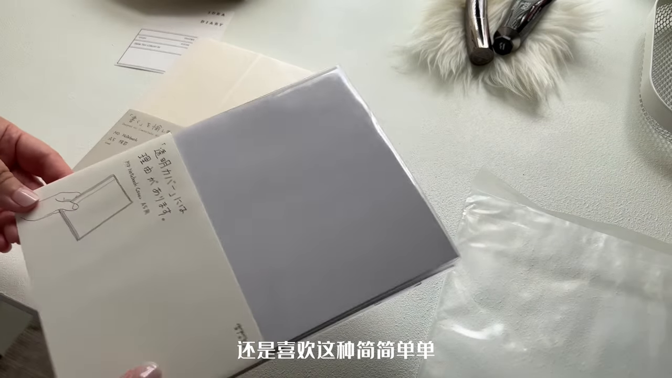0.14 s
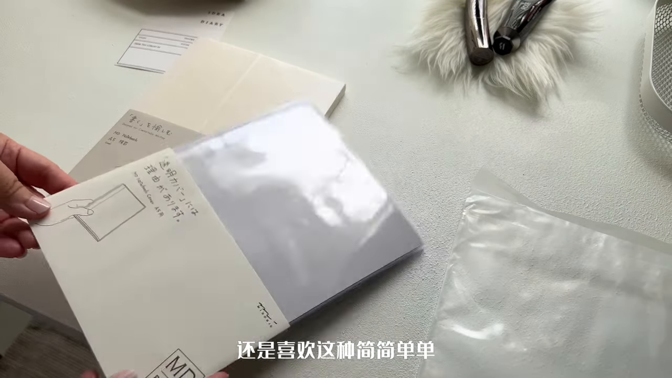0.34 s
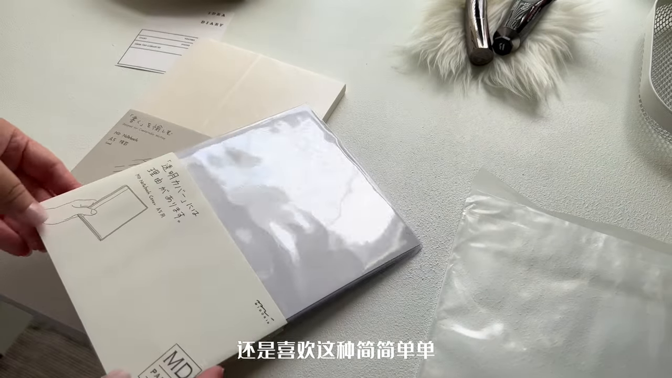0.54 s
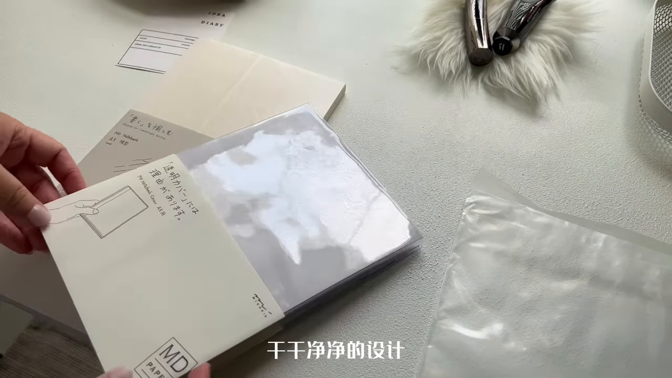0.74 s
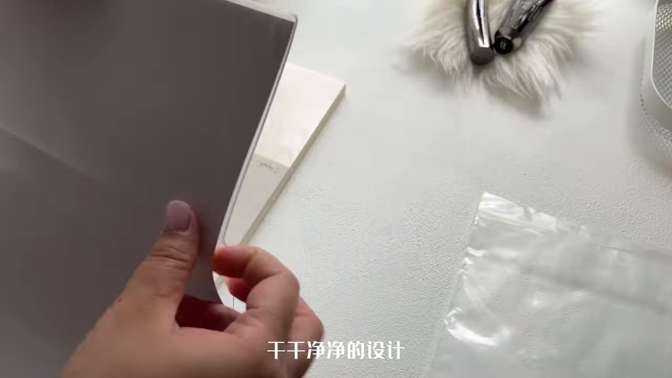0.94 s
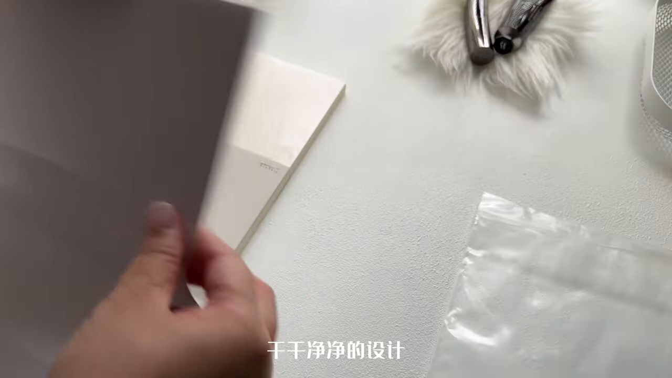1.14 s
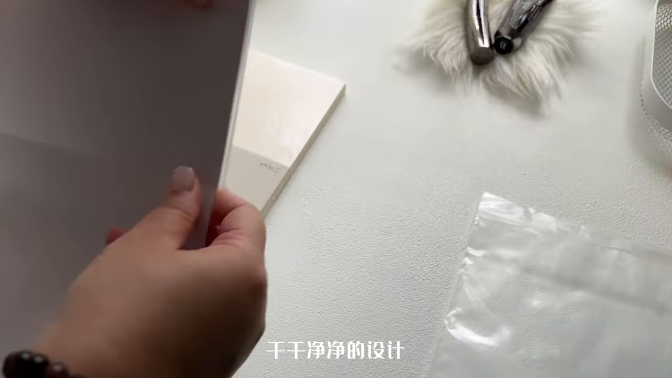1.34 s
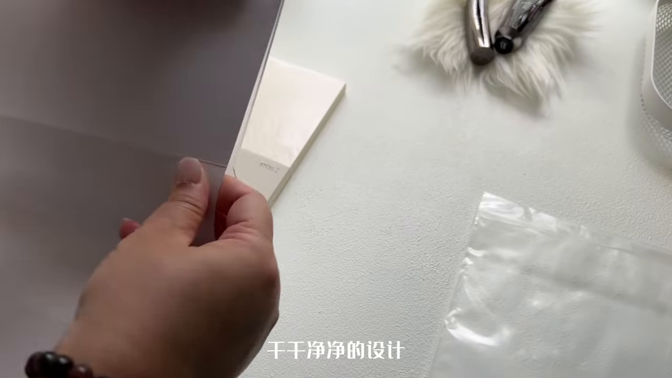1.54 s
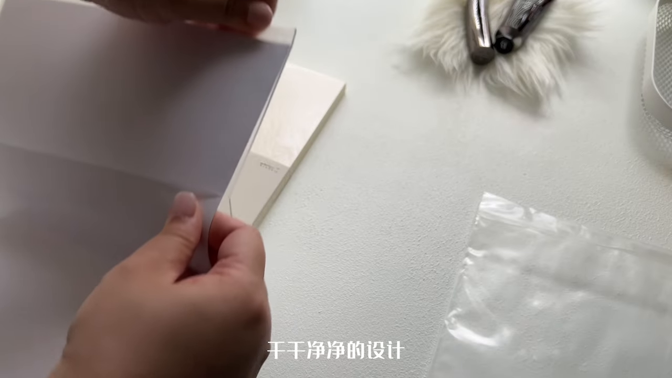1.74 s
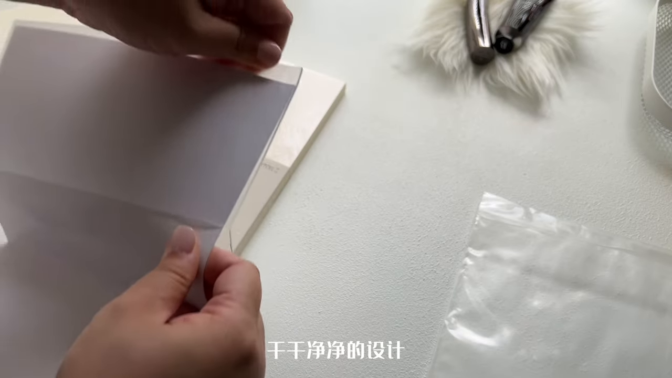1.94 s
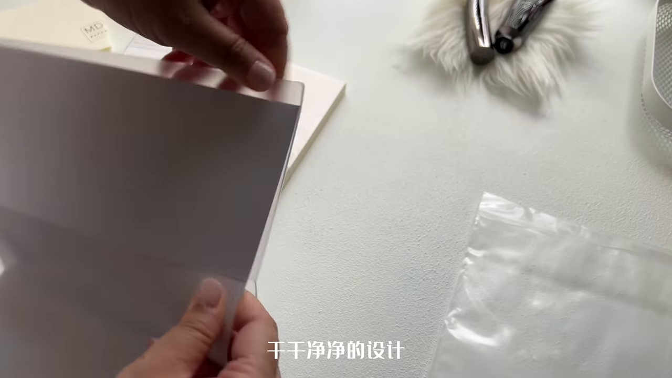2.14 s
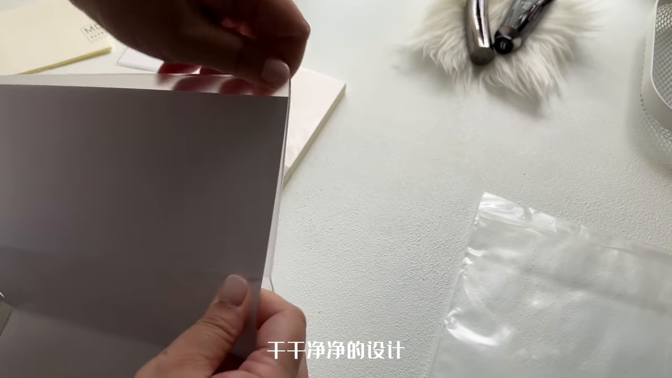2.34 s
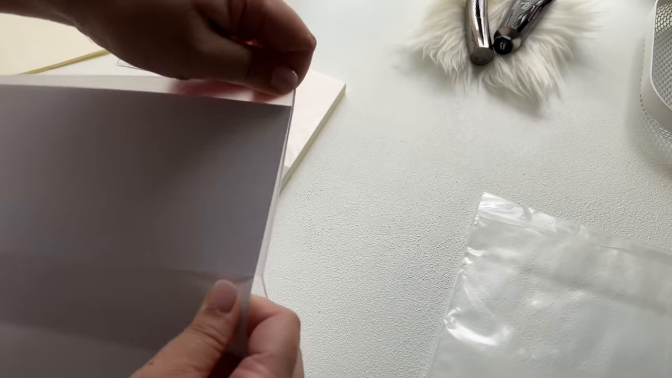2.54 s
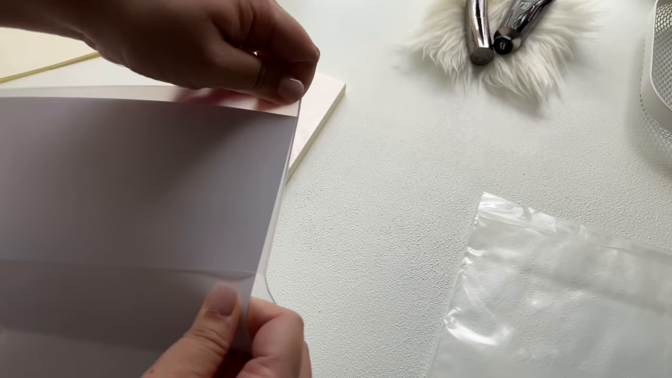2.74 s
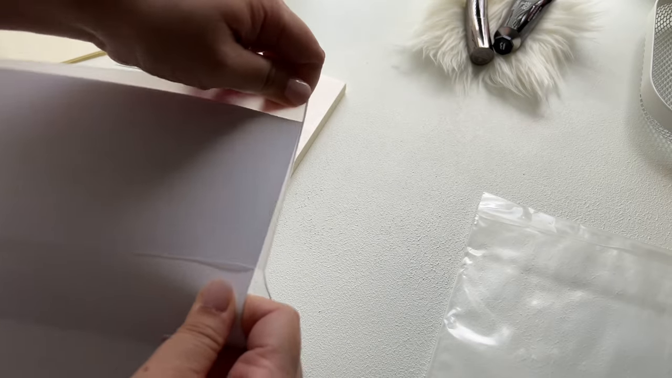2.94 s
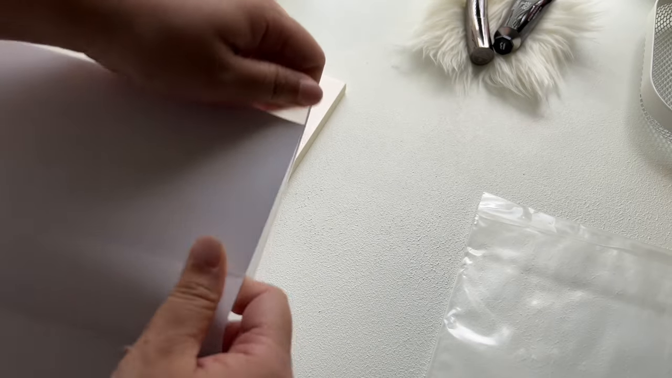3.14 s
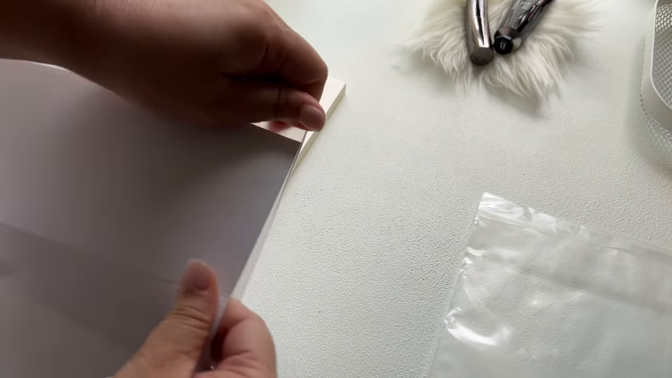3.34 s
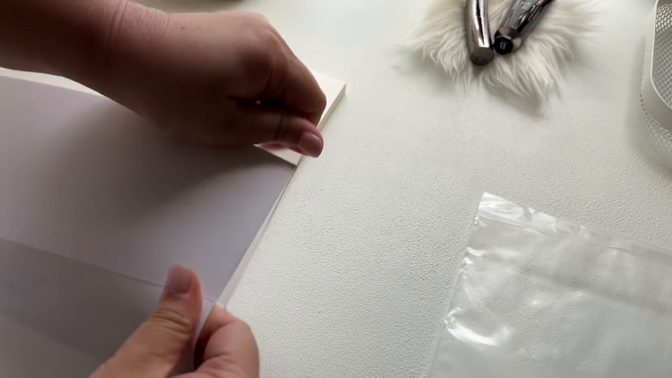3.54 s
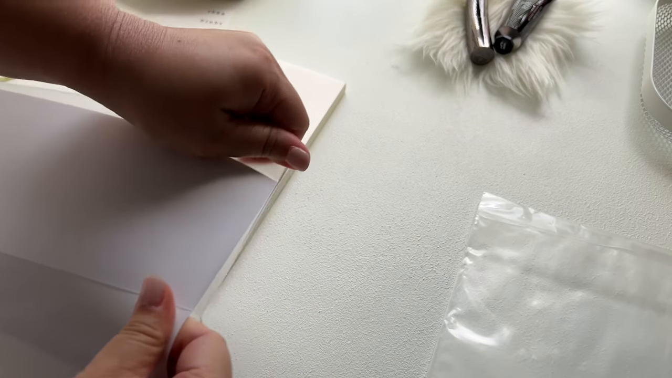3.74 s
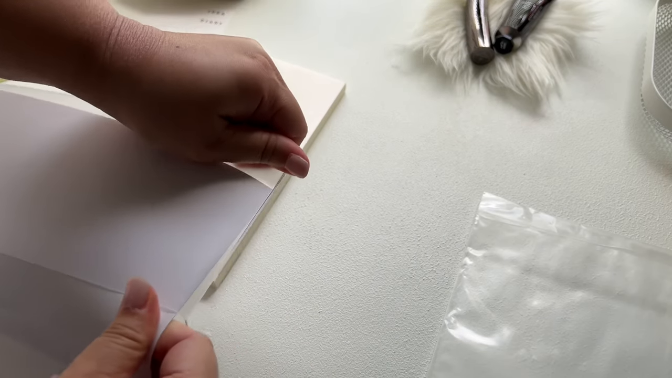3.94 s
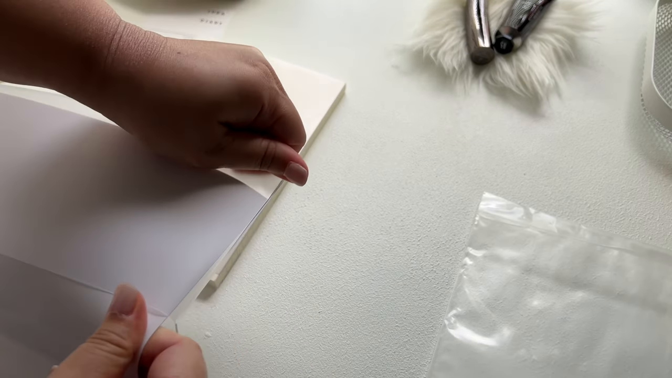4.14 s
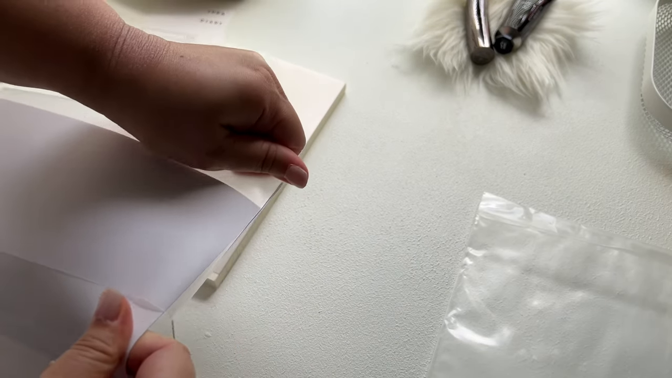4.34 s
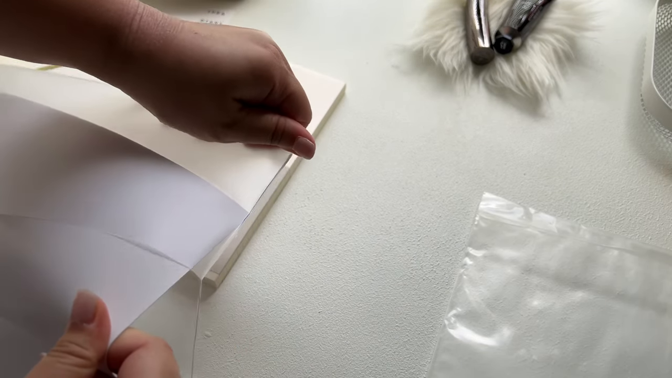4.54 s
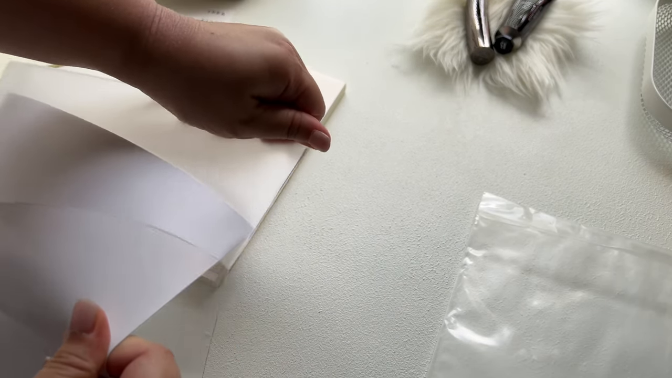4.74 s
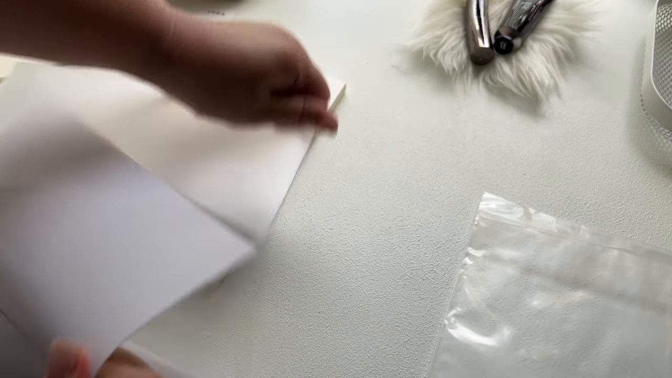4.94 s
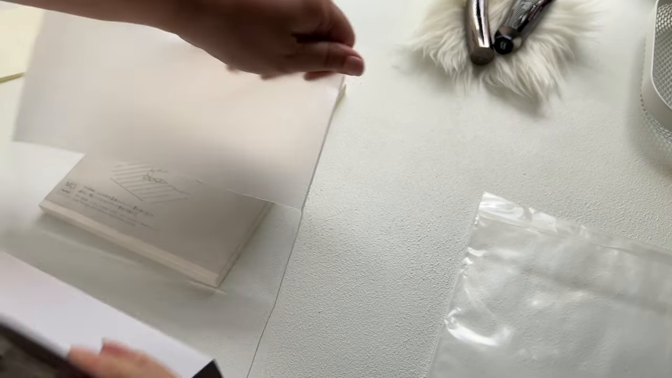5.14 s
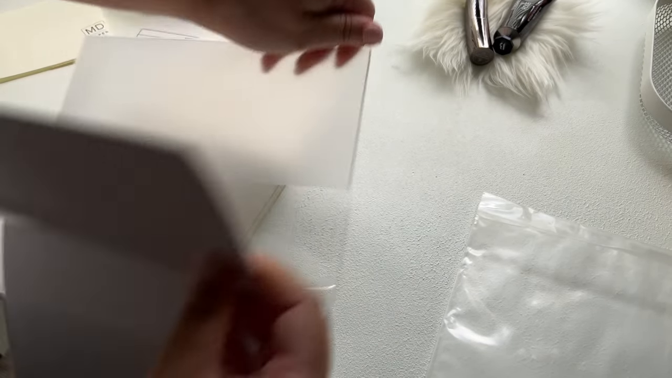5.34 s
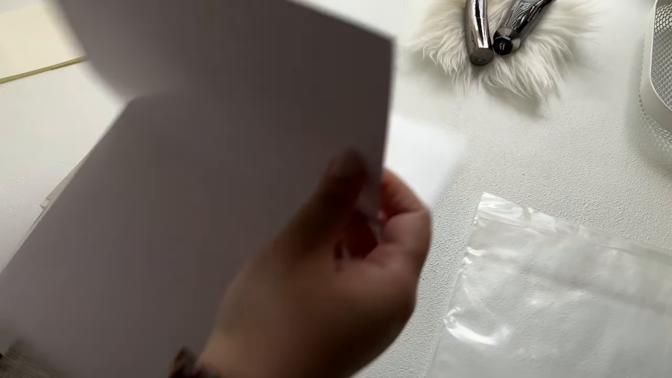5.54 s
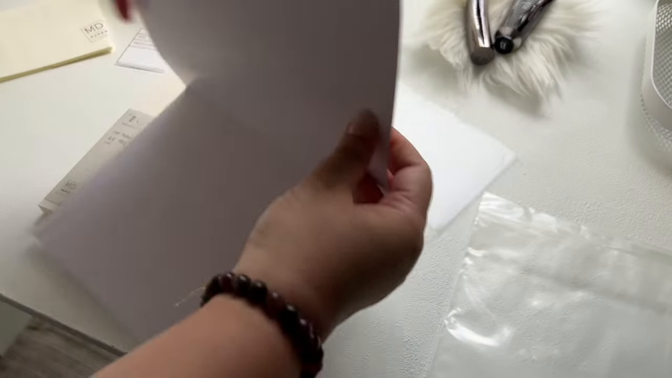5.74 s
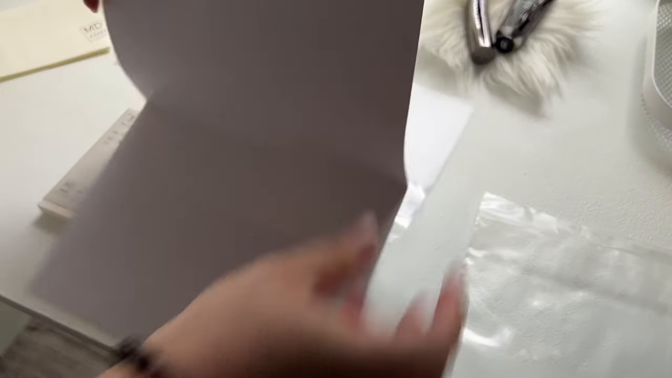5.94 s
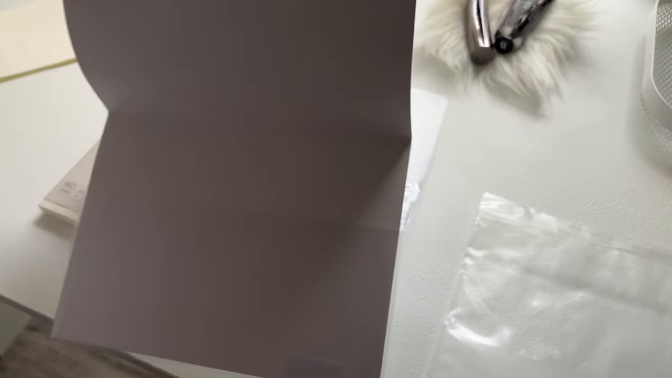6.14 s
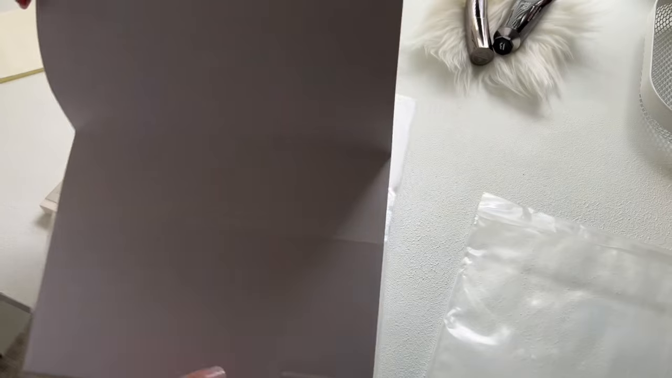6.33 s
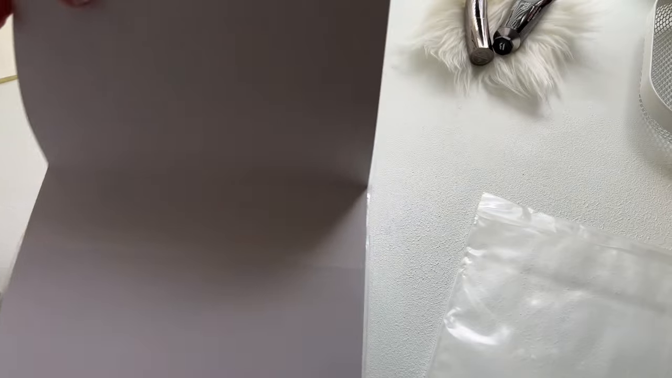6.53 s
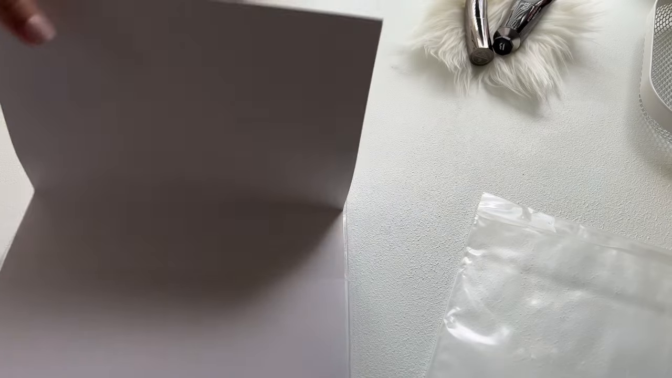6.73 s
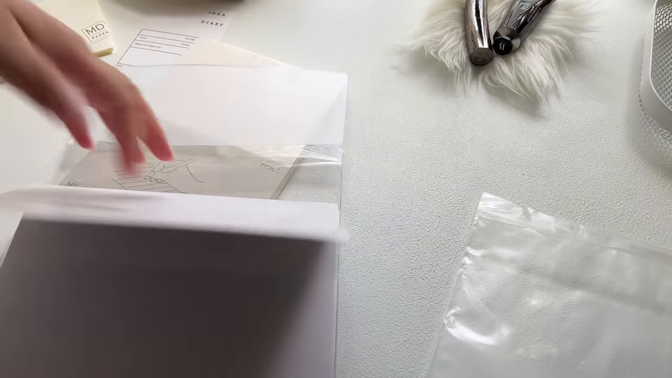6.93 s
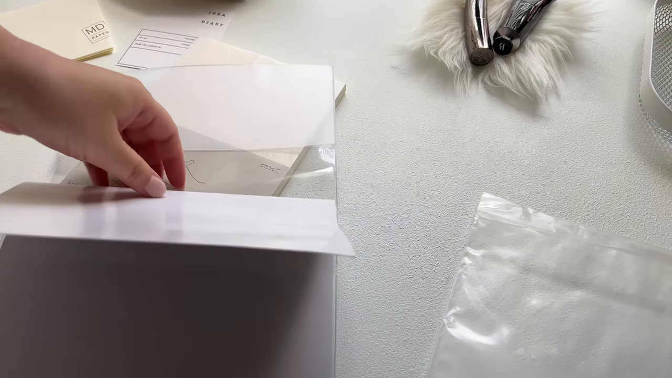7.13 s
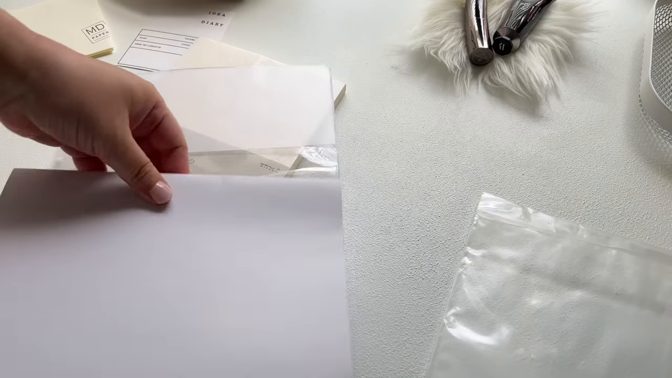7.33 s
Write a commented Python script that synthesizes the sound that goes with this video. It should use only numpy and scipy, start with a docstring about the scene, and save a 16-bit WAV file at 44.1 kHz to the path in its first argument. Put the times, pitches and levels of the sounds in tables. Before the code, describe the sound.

Intimate close stereo pickup, handling slightly left of centre. Card drags against plastic film with soft hisses, isolated dry snaps and little claps, leaving quiet gaps. A longer rasping pull swells, and the cover breaks free with a crisp slapping clatter and weighty desk thump. Afterwards stiff sheets swish, rustle and tap gently, with short small-room reflections and a faint wavering hum beneath.

```python
"""Notebook leaving its plastic sleeve

A card cover is worked out of a clear plastic sleeve on a desk, close to the ear, until it slips free and slaps down.
Friction of card and film is noise made of uneven slips; buckling film snaps and excites resonances of the sleeve.
Landing edges excite the cover and the decaying modes of the desk; the freed cover skims with a rising swish.
A small room adds early copies and a diffuse tail, over a faint wavering hum, a drone and air noise.
"""
import sys
import numpy as np
from scipy import signal
from scipy.fft import rfft, irfft, next_fast_len
from scipy.io import wavfile
from scipy.ndimage import uniform_filter1d, map_coordinates

SR = 44100
rng = np.random.default_rng(int(sys.argv[2]) if len(sys.argv) > 2 else 0)


def materialize(psi):
    """Save the field psi as 16-bit PCM at rate SR to the path in sys.argv[1].

    A 1-D psi becomes a single channel; in a 2-D psi each row is a channel.
    """
    bounded = np.clip(np.atleast_2d(psi).T, -1, 1)
    quanta = np.round(bounded * 32767).astype(np.int16)
    wavfile.write(sys.argv[1], SR, quanta)


N = 330309

# spectrum of the low drag of card on sleeve, also of air pushed by a thud: frequency_hz, density_db (per Hz)
DRAG_SPECTRUM = [(70, -17.5), (150, -2), (400, 2.5), (750, -4), (1300, -10.5), (3000, -45.5)]
# broad resonances of the stiff cover: centre_hz, width_hz, level_db
COVER_MODES = [(394, 26, 7), (626, 260, 2), (850, 200, -2), (1040, 100, -6), (1386, 120, -3),
               (1902, 910, -1.5), (2440, 1100, -3.5), (3730, 1900, -12)]
# balance of the hands' work, left of centre: frequency_hz, left_minus_right_db
HANDS_BALANCE = [(60, 9), (300, 7), (1200, 2), (4000, 4.5), (9000, 1.5), (14000, -1)]

FREE_S = 4.99  # the book slips free
ATTACK_S = 0.025  # sliding takes hold


def amp(db):
    """A level in decibels is 20 log10 of the gain returned."""
    return 10 ** (np.asarray(db) / 20)


def unit(x):
    """Normalise the mean power: rms 1."""
    return x / np.sqrt(np.mean(x ** 2) + 1e-20)


def along(points, hz):
    """Interpolate (Hz, value) points on a logarithmic frequency axis."""
    f, v = np.transpose(points)
    return np.interp(np.log(hz + 1), np.log(f + 1), v)


def wobble(rate, size=N):
    """Smooth random fluctuation: a spline through Gaussian knots, rate of them a second."""
    knots = rng.standard_normal(int(size * rate / SR) + 4)
    return map_coordinates(knots, [np.arange(size) * rate / SR])


def filtered(x, response):
    """Linear filtering: the spectrum is multiplied by a complex response of frequency."""
    n = x.shape[-1]
    m = 2 * next_fast_len(n // 2 + 2048)  # room for the response to ring out
    return irfft(rfft(x, m) * response(np.fft.rfftfreq(m, 1 / SR)), m)[..., :n]


def colour(points):
    """Minimum phase: folding the cepstrum of a (Hz, dB) outline gives a causal response."""
    def response(hz):
        cepstrum = irfft(np.log(amp(along(points, hz))))
        fold = 1 + np.sign(np.fft.fftfreq(len(cepstrum)))
        return np.exp(rfft(cepstrum * fold))
    return response


def resonances(modes):
    """Modal superposition: second-order (centre Hz, width Hz, dB) resonances of alternating sign."""
    def response(f):
        total = 0
        for k, (centre, width, db) in enumerate(modes):
            damping = 1j * f * width
            total = total + (-1) ** k * amp(db) * damping / (centre * centre - f * f + damping)
        return total
    return response


def touched(body, note_hz, note_db, share):
    """Local excitation: a body's broad resonances plus the note of the touched spot, share of its pitch wide."""
    note = [(note_hz, share * note_hz, note_db)]
    return lambda hz: resonances(body)(hz) + resonances(note)(hz)


def stereo(pair):
    """Interchannel coherence: two unrelated signals mix into channels that are alike in the bass."""
    # likeness of the channels: frequency_hz, coherence (0-1)
    likeness = [(60, 1), (200, 0.84), (600, 0.5), (1500, 0.27), (4000, 0.25), (10000, 0.11)]

    def mid_side(hz):
        turn = np.arccos(np.clip(along(likeness, hz), -1, 1)) / 2
        return np.array([np.cos(turn), np.sin(turn)])
    mid, side = filtered(pair, mid_side)
    return np.array([mid + side, mid - side])


def leftward(x, balance=HANDS_BALANCE):
    """Interaural level difference: half of a left minus right balance goes to each channel."""
    return filtered(x, lambda hz: amp(np.outer([.5, -.5], along(balance, hz))))


def add(track, s, sound):
    """Superposition: mix a sound in at time s."""
    part = track[:, max(round(s * SR), 0):][:, :sound.shape[-1]]
    part += sound[..., :part.shape[-1]]


def burst(response, t60, chatter_db, chatter_t60, click=0, rattle_db=4):
    """Impact excitation: decaying noise, click and uneven rattle drive a body; energy of 10 ms at rms 1."""
    t = np.arange(SR // 3) / SR
    rise = .0009  # s
    rattle = unit(amp(rattle_db * np.clip(wobble(350, size=len(t)), -2, 2)))
    chatter = rattle * amp(chatter_db - 60 * t / chatter_t60)
    envelope = (amp(-60 * t / t60) + chatter) * (1 - np.exp(-(t / rise) ** 2))
    force = stereo(rng.standard_normal((2, len(t)))) * envelope
    # one impulse at the same moment in both channels
    force[:, round(2 * rise * SR)] += click * np.linalg.norm(force, axis=1)
    sound = filtered(force, response)
    return sound * np.sqrt(SR // 100 / np.sum(sound ** 2, axis=1, keepdims=True))


def friction(spectrum, grain_db, grain_rate, judder_db):
    """Stick-slip noise: countless tiny slips of uneven size, bunched by the unsteady hand; rms 1."""
    slips = amp(grain_db * wobble(grain_rate) + judder_db * wobble(35))
    return unit(filtered(stereo(rng.standard_normal((2, N))) * slips, colour(spectrum)))


def film(edge_hz):
    """Low-pass loss: the snap of thin plastic, rolled off above the edge."""
    # spectrum of the snap: frequency_hz, density_db (per Hz)
    snap_spectrum = [(900, 1.5), (2200, -2.5), (3800, -0.5), (6000, -3.5), (8800, 0), (10500, -8.5),
                     (15500, -11.5)]
    return lambda hz: colour(snap_spectrum)(hz) / (1 + 1j * hz / edge_hz) ** 2


def hum():
    """Steady background: a low wavering tone, narrow-band drone noise and faint broadband air noise."""
    # bands of the room's drone: centre_hz, width_hz, level_db
    drone_bands = [(34.3, 3.3, -10), (61.5, 8.8, -6), (84.7, 10.6, -9.5), (136.4, 8.7, -13),
                   (222, 6, -17.5)]
    # spectrum of the air noise: frequency_hz, density_db (per Hz)
    air_spectrum = [(20, -28.5), (50, 9), (110, 8), (250, -2.5), (450, -15), (1000, -25), (3000, -33.5),
                    (9000, -48), (15000, -43)]
    hum_hz = 58.8

    def noise(response):
        return unit(filtered(stereo(rng.standard_normal((2, N))), response))
    phase = 2 * np.pi * hum_hz * np.arange(N) / SR + .5 * wobble(3.7)
    tone = np.sqrt(2) * np.sin(phase)
    tone = unit(tone * np.abs(1 + 1.5 * wobble(9)))  # the hum wavers
    drone = noise(lambda hz: resonances(drone_bands)(hz) / (1 + (hz / 300) ** 4))
    return amp(-51.5) * tone + amp(-53.0) * drone + amp(-63) * noise(colour(air_spectrum))


def strokes():
    """Summed powers give gains of drag, rub and hiss: strokes rise, hold and die; a tight card drags more."""
    # hand strokes, relative levels of card rub and film hiss: start_s, length_s, rub_db, hiss_db
    stroke_table = [(0.103, 0.26, -91, -66.5), (0.483, 0.18, -106, -74), (0.761, 0.13, -90, -74.5),
                    (0.928, 0.13, -58.5, -69.5), (1.044, 0.088, -65, -58), (1.113, 0.08, -59, -53),
                    (1.237, 0.061, -67, -60.5), (1.363, 0.056, -78.5, -73), (1.632, 0.7, -78, -91),
                    (1.917, 0.074, -71, -87), (2.053, 0.13, -68, -65.5), (2.84, 0.3, -75.5, -93),
                    (2.994, 0.025, -60, -64), (3.064, 0.21, -62.5, -58.5), (3.278, 0.15, -68.5, -81),
                    (3.553, 0.047, -75, -77), (3.973, 0.062, -71, -106), (4.915, 0.059, -48.5, -38),
                    (5.18, 0.33, -60, -74), (5.403, 0.038, -80, -63), (5.515, 0.11, -57.5, -59),
                    (5.647, 0.036, -44.5, -59), (5.748, 0.12, -63.5, -65.5), (5.903, 0.11, -59, -68),
                    (5.999, 0.72, -72, -80), (6.196, 0.1, -67, -70), (6.54, 0.12, -67.5, -67),
                    (6.643, 0.17, -62, -79), (6.999, 0.1, -64, -75), (7.147, 0.35, -64.5, -85.5),
                    (7.383, 0.068, -76, -66)]
    rest_rub_db, rest_hiss_db = -91, -90.5  # card and film barely moving
    release_db_per_s = 222.5  # a stroke dies once the hand stops
    tight_drag_db, loose_drag_db = 6.5, -3  # drag over rub, before and after the book slips free
    t = np.arange(N) / SR
    power = np.outer(amp([rest_rub_db, rest_hiss_db]) ** 2, np.ones(N))
    for start, length, rub_db, hiss_db in stroke_table:
        rise = np.clip((t - start) / ATTACK_S, 0, 1)
        envelope = rise * amp(-release_db_per_s * np.clip(t - start - length, 0, 1))
        power += np.outer(amp([rub_db, hiss_db]), envelope) ** 2
    rub, hiss = np.sqrt(power)
    drag = rub * amp(np.where(t < FREE_S, tight_drag_db, loose_drag_db))
    return np.array([drag, rub, hiss])


def crinkle(count, centre_hz, spread, cycles, spread_db):
    """Shot noise: creases pop at random moments and pitches, many faint and a few strong; rms 1."""
    out, t = np.zeros((2, N)), np.arange(SR // 100) / SR
    moments, sizes = rng.random(count), rng.exponential(size=count)
    pitches, sides = rng.standard_normal((2, count))
    for when, size, pitch, side in zip(moments, sizes, pitches, sides):
        hz = centre_hz * np.exp(spread * pitch)
        # a pop falls 60 dB in the given number of cycles
        pop = amp(spread_db * min(size, 3) - 60 * t * hz / cycles) * np.sin(2 * np.pi * hz * t)
        add(out, when * N / SR, np.outer([np.cos(side), np.sin(side)], pop))
    return unit(stereo(out))


def patchy(x, depth_db):
    """Time-varying filtering: as the sheet flexes, its colour shifts from moment to moment."""
    z = signal.stft(x, nperseg=512)[2]
    field = rng.standard_normal(z.shape[1:])
    field = uniform_filter1d(field, size=5, axis=0)  # across frequency
    field = uniform_filter1d(field, size=8, axis=1)  # across time
    return signal.istft(z * amp(depth_db * unit(field)), nperseg=512)[1][:, :N]


def off_the_cover(x, centre_delay_s, sway, reflection):
    """Comb filtering: the moving cover mirrors the sound over a changing path, sweeping hollows through it."""
    n = np.arange(N)
    delay = centre_delay_s * np.exp(sway * wobble(2.3)) * SR
    copy = np.array([map_coordinates(channel, [n - delay], order=3) for channel in x])
    return (x + reflection * copy) / np.hypot(1, reflection)


def sliding():
    """Dry friction: card drags and rubs along the sleeve while the thin film hisses and crinkles."""
    # spectra of card rub, whole-face rustle and film hiss: frequency_hz, density_db (per Hz)
    rub_spectrum = [(350, -19), (750, -7.5), (1600, -5), (2400, -8), (3600, -14.5), (6000, -18),
                    (12000, -42.5)]
    rustle_spectrum = [(200, -7.5), (450, -3), (750, -1.5), (1000, 0), (1600, 1.5), (2400, -4),
                       (4200, -6.5), (7000, -16), (14000, -35.5)]
    hiss_spectrum = [(1500, -23), (3500, -1.5), (5200, 5.5), (7000, 3), (8700, 9.5), (10200, -14.5),
                     (11300, 3.5), (12600, -4.5), (13800, -19.5), (15200, -5)]
    stroke_drag, stroke_rub, stroke_hiss = strokes()
    pull_drag, pull_rustle, pull_hiss = pulls()
    drag_gain = np.hypot(stroke_drag, pull_drag)
    hiss_db = 20 * np.log10(np.hypot(stroke_hiss, pull_hiss))
    rub_db = 20 * np.log10(stroke_rub)
    # a long pull slides the whole face of the cover: an even, broad rustle
    rustle = pull_rustle * friction(rustle_spectrum, grain_db=1.5, grain_rate=410, judder_db=-2.0)
    drag = drag_gain * friction(DRAG_SPECTRUM, grain_db=2.5, grain_rate=200, judder_db=1)
    rub = stroke_rub * friction(rub_spectrum, grain_db=1.5, grain_rate=490, judder_db=0.0)
    hiss = amp(hiss_db + 1.5) * friction(hiss_spectrum, grain_db=-0.5, grain_rate=740, judder_db=4.0)
    # a strong hiss gains extra fizz at the very top
    fizz = filtered(hiss, lambda hz: 1 / (1 + (10500 / (hz + 1)) ** 8))
    hiss = hiss + amp((hiss_db + 45) / 2) * fizz
    # creases grow more slowly than the rub: they stand out at a light touch
    pops = crinkle(count=1200, centre_hz=2500, spread=.5, cycles=10, spread_db=4)
    creases = amp(.8 * rub_db - 16) * pops
    sheet = patchy(drag + rub + hiss, depth_db=2.07) + creases
    return leftward(rustle + off_the_cover(sheet, centre_delay_s=0.00066, sway=.4, reflection=0.11))


def ticks():
    """Snap-through buckling: the film snaps and briefly rings the bent sleeve; weak snaps are duller."""
    # buckles, relative levels of snap and ring, note of the spot: start_s, snap_db, ring_db, note_hz
    buckles = [(0.3484, -41, -61, 880), (0.387, -47, -57, 940), (0.958, -55, -49, 770),
               (0.969, -40.5, -44.5, 1400), (1.353, -43.5, -73, 1700), (1.5305, -52, -54, 895),
               (1.6724, -36.5, -44.5, 865), (1.776, -65, -54.5, 1400), (1.856, -57, -59.5, 1590),
               (1.905, -74, -52.5, 860), (1.954, -55, -52, 1390), (1.966, -55, -48, 1370),
               (2.1185, -39.5, -59, 1400), (2.122, -33.5, -52.5, 1440), (2.171, -64, -51.5, 1520),
               (2.441, -62, -55.5, 900), (2.589, -41.5, -50.5, 900), (2.641, -56, -52.5, 860),
               (2.796, -74, -51, 1590), (2.8588, -53, -49.5, 1480), (2.8934, -49, -54, 1840),
               (2.9282, -42, -45.5, 1590), (2.95, -41, -45.5, 1770), (2.9696, -41, -44, 1490),
               (3.0052, -30, -40, 1510), (3.07, -37, -59, 1500), (3.292, -52, -52, 3400),
               (3.387, -49, -56, 1820), (3.445, -46.5, -50.5, 1530), (3.463, -50, -48.5, 1580),
               (3.578, -46, -56, 1480), (3.606, -56.5, -66, 1480), (3.873, -38, -45.5, 884),
               (4.1793, -37, -48.5, 1410), (4.2602, -41.5, -44, 1430), (5.1856, -37, -35, 1830),
               (5.496, -35.5, -45, 1930), (5.5438, -24.5, -50, 2600), (5.669, -45, -38.5, 1710),
               (5.879, -41.5, -70, 4920), (6.639, -46, -56, 4060), (6.676, -42, -50, 1270),
               (7.0056, -40.5, -44.5, 1700), (7.22, -60, -50, 1208), (7.332, -58, -48.5, 1300),
               (7.4174, -46, -44, 2510), (7.472, -54, -38, 1350)]
    # broad resonances of the bent sleeve: centre_hz, width_hz, level_db
    sleeve_modes = [(522, 640, 1), (963, 370, 4.5), (1420, 180, 2), (1910, 630, -11)]
    out = np.zeros((2, N))
    for s, snap_db, ring_db, note_hz in buckles:
        edge_hz = 18000 * amp((snap_db + 45) / 2)
        snap = burst(film(edge_hz), t60=0.016, chatter_db=-31.5, chatter_t60=0.042, click=0.23)
        sleeve = touched(sleeve_modes, note_hz, note_db=9.0, share=0.13)
        ring = burst(sleeve, t60=0.013, chatter_db=-14, chatter_t60=0.074, click=0.17)
        add(out, s, amp(snap_db - 17.0) * snap + amp(ring_db - 6.5) * ring)
    return leftward(out)


def scuffs():
    """Forced resonance: the card catches, and a short soft swell of slips rings the stiff cover."""
    # scuffs, with the note of the bent spot and the Gaussian spread: peak_s, level_db, note_hz, spread_s
    scuff_table = [(1.066, -43, 660, 0.0096), (5.404, -48, 1803, 0.01), (5.687, -38.5, 1744, 0.0072),
                   (5.782, -51.5, 1260, 0.0079), (5.834, -55, 1717, 0.0085), (5.967, -54.5, 1360, 0.0203),
                   (6.297, -60, 585, 0.02), (6.41, -58, 478, .014), (6.738, -48, 737, 0.0092),
                   (7.087, -49, 1090, 0.0064), (7.482, -47.5, 1340, 0.0033)]
    soft_edge_hz = 14000  # a scuff is soft above this
    out, t = np.zeros((2, N)), np.arange(SR // 5) / SR - .1
    for s, db, note_hz, spread_s in scuff_table:
        slips = stereo(rng.standard_normal((2, len(t)))) * amp(0.91 * wobble(430, size=len(t)))
        cover = touched(COVER_MODES, note_hz, note_db=10, share=0.18)
        sound = unit(filtered(slips, lambda hz: cover(hz) / (1 + 1j * hz / soft_edge_hz)))
        add(out, s + t[0], amp(db) * np.exp(-(t / spread_s) ** 2 / 2) * sound)
    return leftward(out)


def thud(attack, ring_share):
    """Modal decay: a soft blow pushes the air under the book; desk and book ring, each mode varying in level."""
    # modes of the book lying on the desk: frequency_hz, level_db, t60_s
    desk_modes = [(61.5, -9.5, 0.38), (89.6, 1, 0.16), (107, -3.5, 0.23), (136.4, -0.5, .38),
                  (197.5, -3, 0.15), (255, 0.5, 0.13), (298.2, -1.5, 0.11), (396, 1, 0.11)]
    t = np.arange(SR // 3) / SR
    ring = 0
    for k, (hz, db, t60) in enumerate(desk_modes):
        decay = amp(db + rng.standard_normal() - 60 * t / (t60 * ring_share))
        ring = ring + (-1) ** k * decay * np.sin(2 * np.pi * hz * t)
    push = burst(colour(DRAG_SPECTRUM), t60=0.06, chatter_db=-16.5, chatter_t60=0.17)
    return ring * (1 - np.exp(-t / attack)) + amp(-2.5) * push


def knocks():
    """Impact: a landing edge slaps the film and claps the cover, and the book's weight thuds into the desk."""
    # landings, relative levels of cover clap, desk thud and film slap, note of the struck spot:
    # start_s, clap_db, thud_db, slap_db, note_hz
    landings = [(1.1358, -22.5, -45, -58, 695), (1.151, -29.5, -67, -55, 660),
                (1.173, -48, -45.5, -66, 614), (1.399, -50, -46, -74, 590), (2.167, -44, -47.5, -76, 960),
                (2.198, -57, -45.5, -53, 870), (2.298, -38, -38.5, -51.5, 1200),
                (3.0798, -32.5, -42.5, -33.5, 570), (3.234, -31.5, -40, -53, 1520),
                (4.906, -22.5, -25.5, -23, 1084), (4.914, -21, -35, -23.5, 3300),
                (4.967, -27, -50, -45.5, 674), (4.996, -21.5, -17.5, -12, 774),
                (5.0341, -11.5, -30.5, -17.5, 1276), (5.048, -22, -23.5, -43.5, 900),
                (5.066, -28.5, -27.5, -46.5, 1000), (5.115, -43, -36, -57, 650),
                (5.6155, -29.5, -35.5, -33, 900), (5.821, -40.5, -46.5, -47, 720),
                (6.5336, -36, -46.5, -48, 976), (7.1758, -29.5, -54, -50, 1112)]
    # balance of the landings, left of centre: frequency_hz, left_minus_right_db
    landing_balance = [(150, 2.5), (600, 4), (1200, 4), (4000, 5), (9000, 2.5)]
    thud_lag_s = 0.005  # the weight follows the edge
    held_ring = 0.65  # share of the ring time left while the hands hold the book
    out = np.zeros((2, N))
    for s, clap_db, thud_db, slap_db, note_hz in landings:
        # a slap that is weak beside its clap sounds duller
        edge_hz = 18000 * amp(.7 * (slap_db - clap_db))
        slap = burst(film(edge_hz), t60=0.014, chatter_db=-21.0, chatter_t60=0.15, click=0.5)
        cover = touched(COVER_MODES, note_hz, note_db=12.0, share=0.1)
        clap = burst(cover, t60=0.01, chatter_db=-19, chatter_t60=0.12, click=0.39)
        add(out, s, amp(slap_db - 8.0) * slap + amp(clap_db - 11.0) * clap)
        weight = thud(attack=0.00071, ring_share=held_ring if s < FREE_S else 1)
        add(out, s + thud_lag_s, amp(thud_db - 5.0) * weight)
    return leftward(out, landing_balance)


def pulls():
    """Level-dependent spectrum: one effort sets drag, rustle and hiss; the harder the pull, the brighter."""
    # effort of the long pulls that draw the cover out: time_s, effort_db
    effort_curve = [(4.08, -75), (4.194, -59), (4.318, -54), (4.383, -46.5), (4.444, -44), (4.487, -46),
                    (4.51, -60), (4.58, -64.5), (4.661, -46.5), (4.71, -47.5), (4.84, -49), (4.9, -45)]
    # drag, rustle and hiss in turn, relative level at a hard pull and growth: level_db, growth_db_per_db
    growth_laws = [(-53, 0.5), (-40, 1.5), (-45.5, 3.5)]
    full_db, fade_s = -44.5, 0.067  # effort of a hard pull; time to take hold and let go
    t = np.arange(N) / SR
    s, db = np.transpose(effort_curve)
    effort_db = np.interp(t, s, db) - full_db
    held = np.clip(1 + np.minimum(t - s[0], s[-1] - t) / fade_s, 0, 1)
    return held * np.array([amp(level_db + growth * effort_db) for level_db, growth in growth_laws])


def swish():
    """Frequency scaling with speed: the freed cover skims over the film and its colour glides upward."""
    # spectrum at the start of the glide: frequency_hz, density_db (per Hz)
    swish_spectrum = [(300, -4), (1100, 3), (1650, -1), (2300, -8.5), (2800, -20), (3400, -13.5),
                      (7000, -24.5), (12000, -45)]
    start_s, length_s, start_db = 5.178, 0.22, -46
    octaves_per_s, growth_db_per_s, stop_db_per_s = 1.7, 9, 700
    out, t = np.zeros((2, N)), np.arange(SR // 2) / SR
    # reading the noise ever faster raises its spectrum
    position = np.cumsum(2 ** (octaves_per_s * t))
    noise = friction(swish_spectrum, grain_db=3.5, grain_rate=400, judder_db=-2.1)
    gliding = np.array([map_coordinates(channel[:SR], [position]) for channel in noise])
    db = start_db + growth_db_per_s * t - stop_db_per_s * np.maximum(t - length_s, 0)
    add(out, start_s, np.clip(t / ATTACK_S, 0, 1) * amp(db) * gliding)
    return leftward(out)


def room(x, wet_db, early_db):
    """Reverberation: desk top and near walls send weak copies, with a short diffuse tail and little bass."""
    # decay of the room: frequency_hz, t60_s
    decay_times = [(100, 0.48), (700, 0.29), (2000, 0.28), (5000, 0.23), (13000, 0.27)]
    hz, t, z = signal.stft(rng.standard_normal((2, SR // 2)), SR, nperseg=256)
    t60 = np.maximum(along(decay_times, hz), .02)[:, None]
    tail = signal.istft(z * amp(-60 * t / t60), SR, nperseg=256)[1]
    answer = amp(wet_db) * tail / np.linalg.norm(tail[0])
    for channel in answer:
        lags = (rng.uniform(0, .009, 6) * SR).astype(int)
        channel[lags] += amp(early_db) * rng.choice([-1, 1], len(lags))
    answer = filtered(answer, lambda f: 1j * f / (300 + 1j * f))
    delayed = np.pad(x, ((0, 0), (SR // 500, 0)))  # 2 ms
    return x + signal.fftconvolve(delayed, answer, axes=1)[:, :N]


def scene():
    """Superposition: sliding and contacts sound in the room, contacts with a stronger tail, over the hum."""
    rubbing = room(sliding() + swish() + scuffs(), wet_db=-9, early_db=-19.5)
    contacts = room(ticks() + knocks(), wet_db=-7.0, early_db=-19.5)
    return rubbing + contacts + hum() * amp([[.5], [-.5]])


def record(dry):
    """Gain and band limiting: the level dips briefly once, and nothing is kept above the limit."""
    top_hz = 16050
    dip = np.interp(np.arange(N) / SR, [.928, .934, .950, .956], [1, .03, .03, 1])
    return filtered(dry * dip, lambda hz: hz < top_hz)


dry = scene()
out = record(dry)
materialize(out)
```